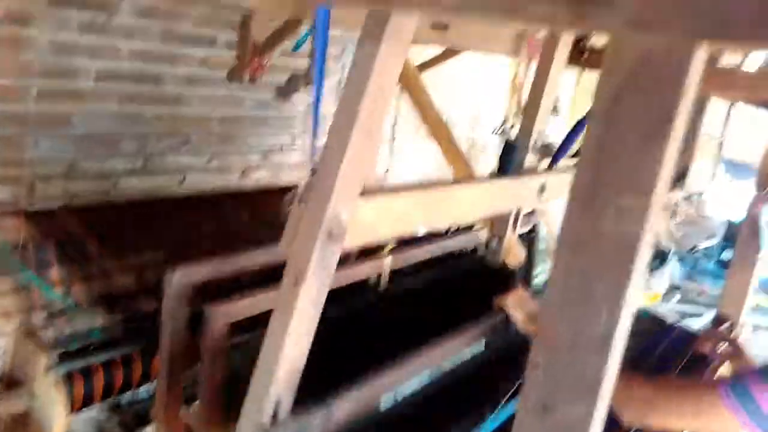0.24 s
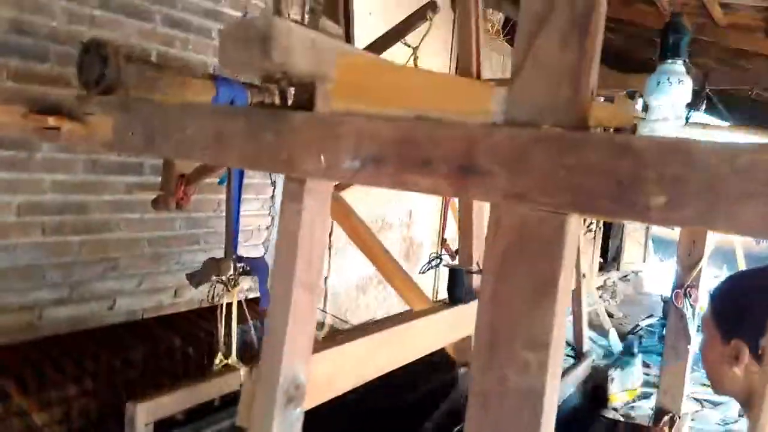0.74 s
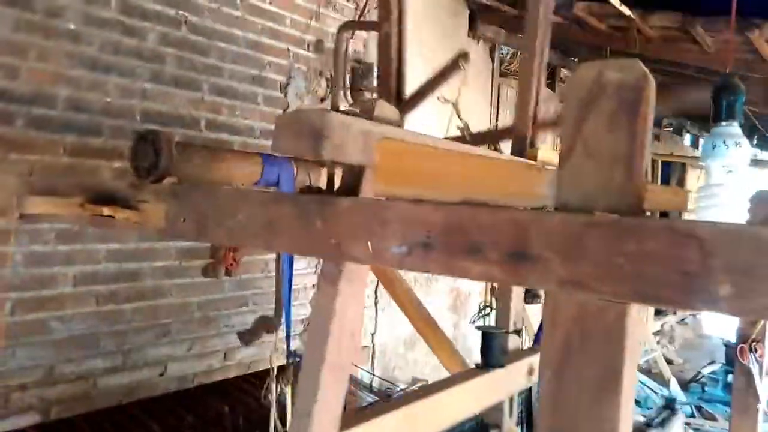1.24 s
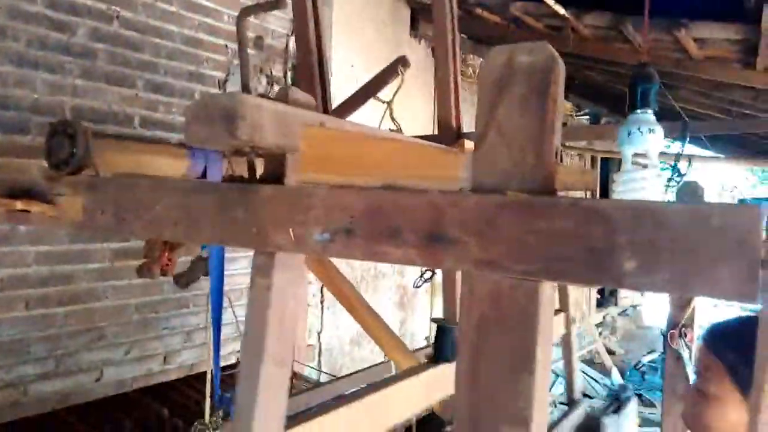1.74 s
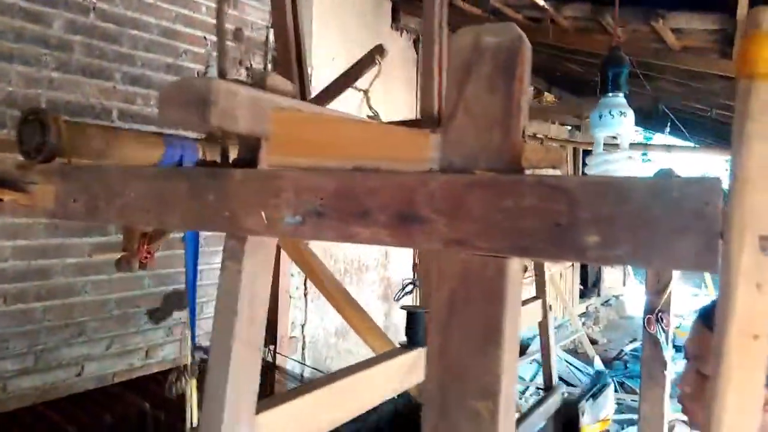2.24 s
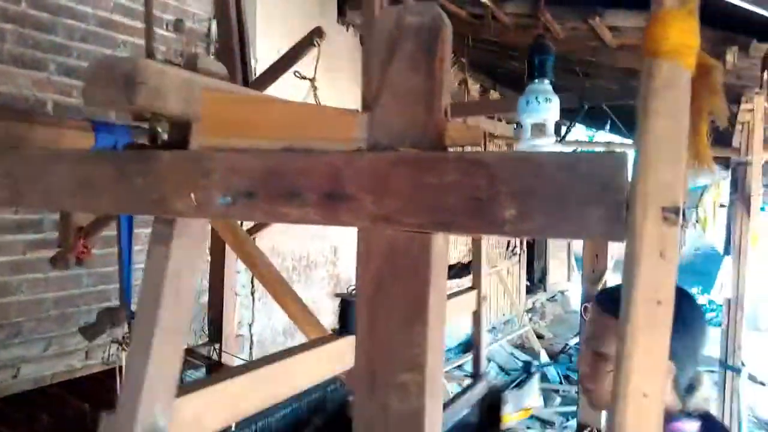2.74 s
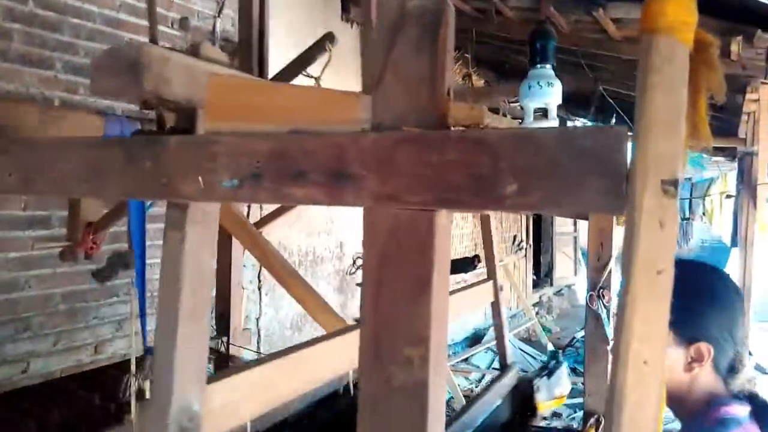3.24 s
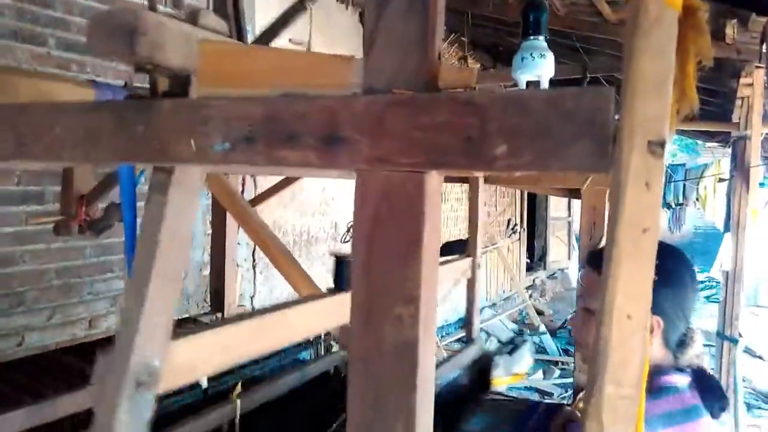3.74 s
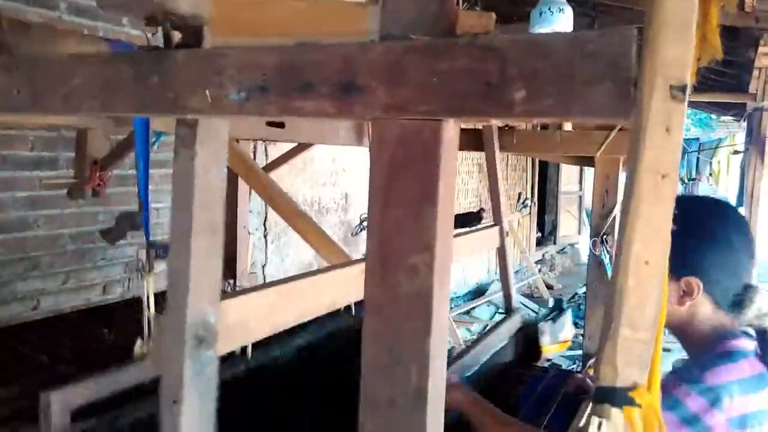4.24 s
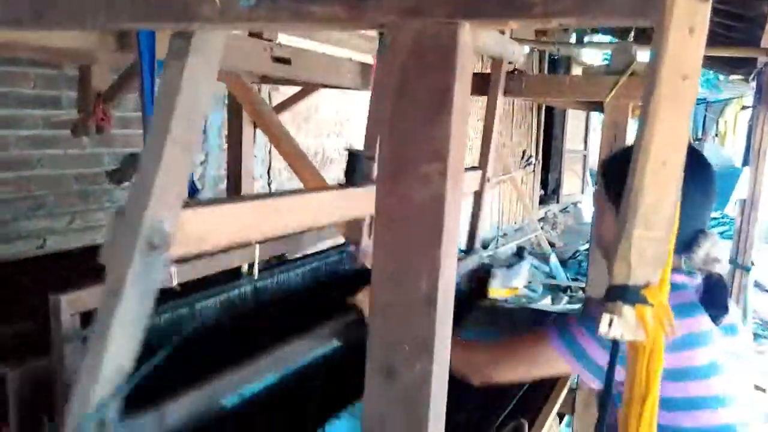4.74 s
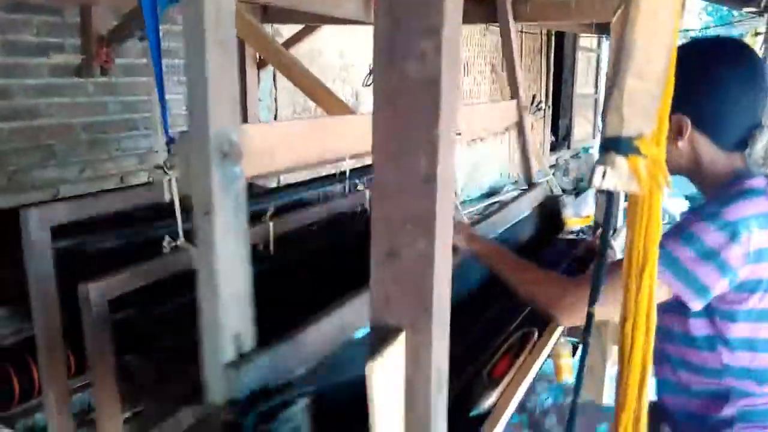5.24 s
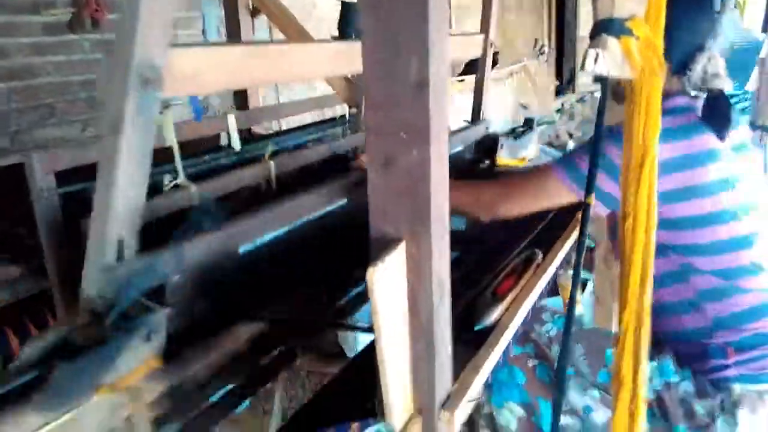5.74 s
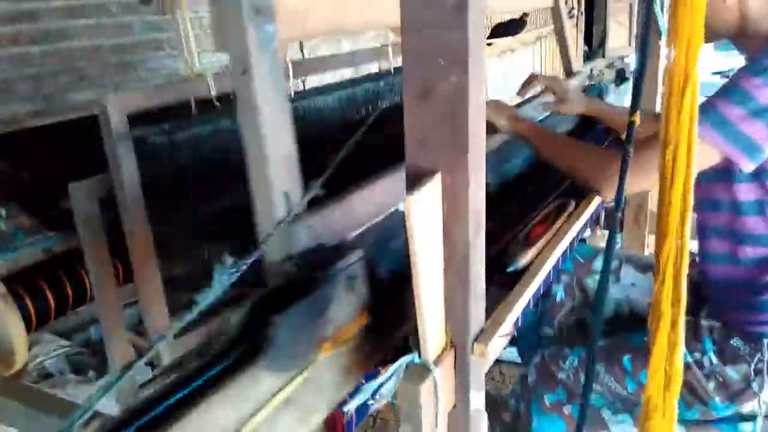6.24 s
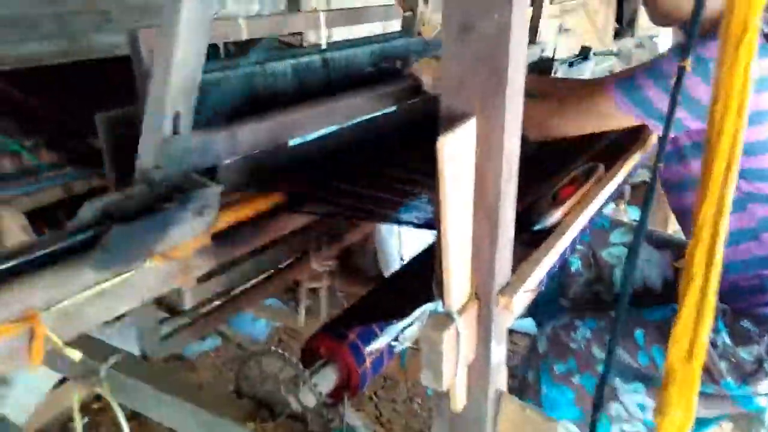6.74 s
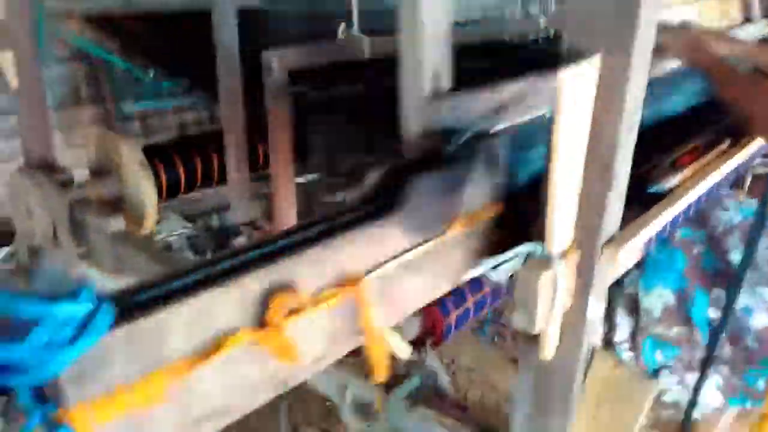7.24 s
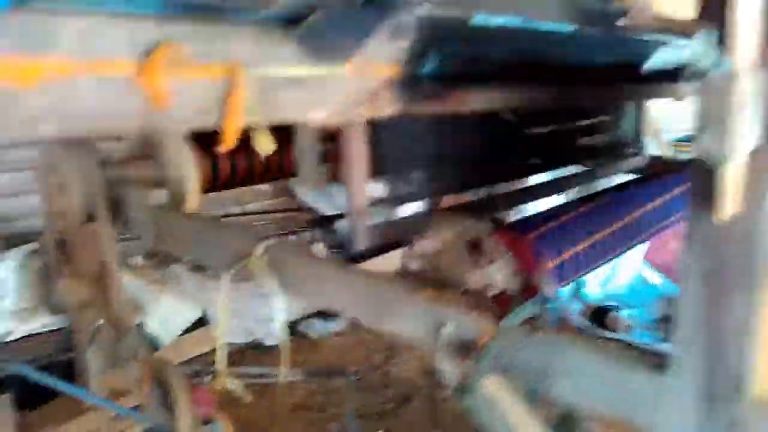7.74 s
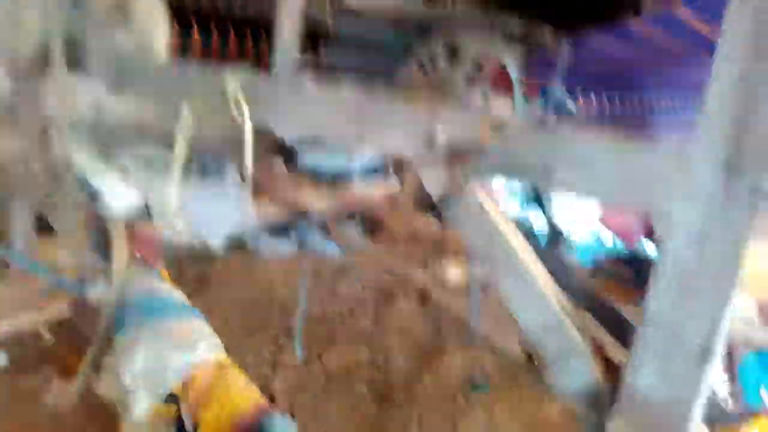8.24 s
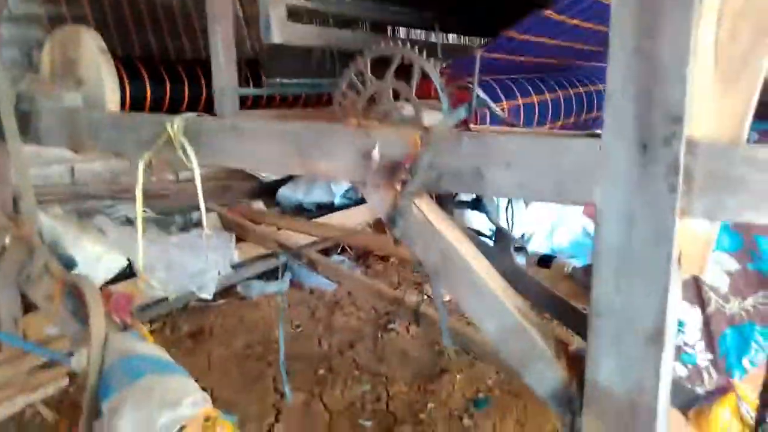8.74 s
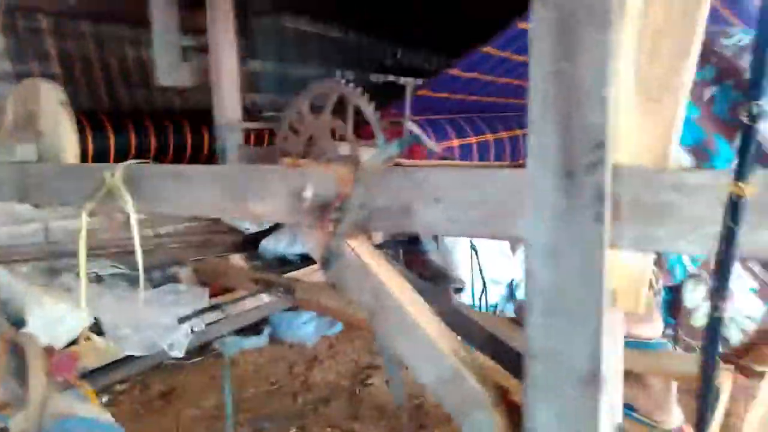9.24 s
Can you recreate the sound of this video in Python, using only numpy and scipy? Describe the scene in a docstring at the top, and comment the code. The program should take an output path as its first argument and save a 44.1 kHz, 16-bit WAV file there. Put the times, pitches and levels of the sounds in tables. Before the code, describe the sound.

Sharp wooden clacks repeat in a quick, even pattern as a handloom weaves close to the microphone. Each cycle brings a light clatter of treadles, the slap that throws the shuttle, then a cluster of knocks as it lands and the beater strikes. Threads rustle softly and thin wires tick between the blows, with only faint, still workshop air behind.

```python
"""A brick-walled workshop: a wooden fly-shuttle handloom, heard close, weaves about one pick a second.
Each stroke: treadle and heddle shafts clatter, a picker flings the shuttle, it lands in the opposite
box and rings its steel, then the beater swings home and the frame rattles. Between blows warp threads
rustle and wire heddles tick, over still air and a faint hum. Wood is decaying noise in clusters of
dense modes; steel and the sley (the beam carrying reed and boxes) ring as beating partials."""
import sys
import numpy as np
from scipy import signal
from scipy.fft import rfft, irfft
from scipy.io import wavfile

SR = 44100
rng = np.random.default_rng(int(sys.argv[2]) if len(sys.argv) > 2 else 0)


def to_wav(sig):
    """Store sig (one row per channel, or 1-D mono) as 16-bit WAV at the path in sys.argv[1].

    Samples outside -1..1 are clipped; the rate is SR.
    """
    pcm = np.clip(np.atleast_2d(sig), -1, 1) * 32767
    pcm = np.round(pcm).astype(np.int16)
    wavfile.write(sys.argv[1], SR, pcm.T)  # frames by channels


N = 418068
TIME_S = np.arange(N) / SR
AGE_S = np.arange(int(.6 * SR)) / SR  # life of one blow

# picker blows, outward and return in turn: start_s, wood_db, treble_db
STROKES = [(0.167, -5.5, -7), (1.126, -2.5, -7.5), (2.094, -6.5, -10), (3.043, -2, -6.5), (4.01, -5.5, -8),
           (4.975, -1.5, -8), (5.94, -6.5, -9.5), (6.89, -1.5, -6.5), (7.863, -7, -10), (8.817, 0.5, -7)]
# spectrum of shuttle and beater impacts: freq_hz, gain_db
IMPACT_COLOUR = [(40, -36), (110, -15.5), (300, -13.5), (450, -12.5), (750, -5), (1250, -0.5), (1800, -0.5),
                 (2800, 0), (4200, -1.5), (6500, -5.5), (10500, 1), (12500, -7.5), (14200, -14)]
# sley modes: pitch_hz, level_db, base_t60_s
SLEY_MODES = [(783, -9.5, .14), (983, -5.5, 0.16), (1280, -19, 0.13), (1375, -0.5, 0.083),
              (1389, -6.5, 0.27), (1406, -5, 0.12), (1740, -20, 0.056), (2333, -4, 0.19), (3100, -12, 0.13)]


def amp(db):
    return 10 ** (np.asarray(db) / 20)


def fade(t60_s):
    """Exponential decay over one blow."""
    return np.exp(-np.log(1000) * AGE_S / t60_s)


def add(track, start_s, sound):
    """Mix in a stereo sound."""
    i = min(max(int(start_s * SR), 0), N)
    track[:, i:i + sound.shape[1]] += sound[:, :N - i]


def colour(x, points):
    """Minimum-phase filter through points: freq_hz, gain_db."""
    size = 2048
    hz, db = np.transpose(points)
    bins_hz = np.maximum(np.arange(size // 2 + 1) * SR / size, 1)
    gain = amp(np.interp(np.log(bins_hz), np.log(hz), db))
    cepstrum = irfft(np.log(gain))
    cepstrum[1:size // 2] *= 2
    cepstrum[size // 2 + 1:] = 0
    impulse = irfft(np.exp(rfft(cepstrum)))
    return signal.fftconvolve(x, impulse[None], axes=1)[:, :N]


def flutter(count, rate_hz, depth_db):
    """Random gain, rms 1."""
    steps = np.arange(count) * rate_hz / SR
    levels = np.clip(rng.standard_normal(count), -2, 2)
    gain = amp(depth_db * np.interp(steps, np.arange(count), levels))
    return gain / np.sqrt(np.mean(gain ** 2))


def wood_modes(ripple_db=4.3, spacing_hz=75):
    """Dense modes in strong and weak clusters: three stereo noise bands, rms 1."""
    hz = np.arange(len(AGE_S) // 2 + 1) * SR / len(AGE_S)
    cluster_index = np.log1p(hz / 3500) * 3500 / spacing_hz
    strengths = np.clip(rng.standard_normal(200), -2, 2)
    clusters = amp(ripple_db * np.interp(cluster_index, np.arange(200), strengths))
    noise = irfft(rfft(rng.standard_normal((2, len(AGE_S)))) * clusters, len(AGE_S))
    bands_hz = [(400, 6500), (6500, 14500), (35, 400)]  # wood, treble, thump
    filters = [signal.butter(3, band, "band", fs=SR, output="sos") for band in bands_hz]
    bands = np.array([signal.sosfilt(sos, noise) for sos in filters])
    return bands / bands.std(axis=(1, 2), keepdims=True)


def blows(rows, spectrum, wood_db, wood_t60_s, treble_db, treble_t60_s, thump_db, thump_t60_s,
          crack_db, crack_t60_s, room_db, room_t60_s, chatter_db=0):
    """Struck wood: crack, modes, joint chatter, room tail. Rows: start_s, wood_db, treble_db, rise_s."""
    out = np.zeros((2, N))
    crack = amp(crack_db) * fade(crack_t60_s)
    room = amp(room_db) * fade(room_t60_s)
    decays = [np.sqrt(fade(t60_s) ** 2 + crack ** 2 + room ** 2) for t60_s in (wood_t60_s, treble_t60_s)]
    decays.append(fade(thump_t60_s))
    for start_s, wood, treble, rise_s in rows:
        gains = amp([wood + wood_db, treble + treble_db, wood + thump_db])
        attack = 1 - np.exp(-(AGE_S / rise_s) ** 2)
        chatter = flutter(len(AGE_S), rate_hz=359, depth_db=chatter_db)
        bands = wood_modes()  # each blow lands on a new spot and wakes other modes
        body = sum(gain * decay * band for gain, decay, band in zip(gains, decays, bands))
        add(out, start_s, attack * chatter * body)
    return colour(out, spectrum)


def ring(rows, modes, ring_db, t60_scale, split_hz, partials=5):
    """Ringing modes, each a cluster of close partials that beat. Rows: start_s, level_db."""
    out = np.zeros((2, N))
    age_s = AGE_S[:len(AGE_S) // 2]
    hop = 64
    attack = np.minimum(age_s / 0.00087, 1)
    hz, mode_db, base_t60_s = np.transpose(modes)[:, :, None]
    decaying = np.exp((2j * np.pi * hz - np.log(1000) / (base_t60_s * t60_scale)) * age_s)
    for start_s, level_db, *_ in rows:
        detune_hz = split_hz * rng.uniform(-1.02, 1, (partials, 1, len(modes), 1))
        phase_turns = detune_hz * age_s[::hop] + rng.random((partials, 2, len(modes), 1))
        beating = np.exp(2j * np.pi * phase_turns).sum(axis=0) / np.sqrt(partials)
        beating = np.repeat(beating, hop, axis=2)[:, :, :len(age_s)]
        tones = amp(level_db + mode_db + ring_db) * decaying
        add(out, start_s, (beating * tones).imag.sum(axis=1) * attack)
    return out


def workshop(air_db=-55, hum_hz=163, hum_gain_db=-1):
    """Still air; a faint hum swells and fades."""
    # air spectrum: freq_hz, gain_db
    air_colour = [(30, -8), (120, -6), (300, -3), (900, 0), (1550, -2), (1720, 4), (1950, -3), (6000, -8),
                  (10300, -2), (14000, -17)]
    # hum envelope: time_s, level_db
    hum_curve = [(0, -81), (5.2, -81), (5.799, -67), (6.4, -60), (6.8, -58), (7.2, -70), (8.6, -74),
                 (9.099, -76), (9.48, -58)]
    air = colour(rng.standard_normal((2, N)), air_colour)
    hum_db = np.interp(TIME_S, *np.transpose(hum_curve)) + hum_gain_db
    hum = amp(hum_db) * np.sin(2 * np.pi * hum_hz * TIME_S)
    return air * amp(air_db) / air.std() + hum


def threads(gain_db=-2):
    """Warp threads catch and slip on the reed, four swells a stroke."""
    # shed opens, shuttle flies, beater in, beater back: peak_after_picker_s, rise_s, fall_s, level_db
    rubs = [(-.025, 0.082, 0.073, -31), (.1, 0.037, 0.15, -34), (.365, 0.06, 0.048, -24),
            (0.558, 0.049, 0.048, -30)]
    # rustle spectrum: freq_hz, gain_db
    rustle_colour = [(40, -12), (200, -8.5), (450, -0.5), (950, 6), (1550, 5.5), (1730, 9.5), (1950, 2.5),
                     (3000, 3.5), (5000, 1), (7500, -4), (10300, 5), (12500, 0), (14200, -4)]
    offset_s = np.arange(-SR // 2, SR) / SR
    swells = np.zeros(len(offset_s))
    for peak_s, rise_s, fall_s, level_db in rubs:
        width_s = np.where(offset_s < peak_s, rise_s, fall_s)
        swells += amp(level_db) * np.exp(-((offset_s - peak_s) / width_s) ** 2)
    rubbing = sum(np.interp(TIME_S - start_s, offset_s, swells, left=0, right=0)
                  for start_s, *_ in STROKES)
    tugs = flutter(N, rate_hz=45, depth_db=3.5)
    catches = flutter(N, rate_hz=900, depth_db=4) * tugs
    return colour(rng.standard_normal((2, N)) * catches * rubbing * amp(gain_db), rustle_colour)


def shafts(tread_rise_s=0.0042, scatter_s=.0008, scatter_db=1):
    """Treadles lift and drop the heddle shafts: light, hollow clacks, never quite alike."""
    # clack as the treadle goes down: start_s, wood_db, treble_db
    treads = [(0.065, -16.5, -24), (1.032, -14, -18), (1.996, -14.5, -20), (2.946, -16.5, -21.5),
              (3.909, -15, -23), (4.883, -19.5, -34), (5.839, -17.5, -26), (6.794, -11, -15.5),
              (7.764, -15.5, -20), (8.724, -15.5, -18)]
    # clacks of each outward stroke: after_picker_s, wood_db, treble_db, rise_s
    outward = [(-.155, -28.5, -32.5, 0.0053), (-.064, -17, -26, 0.0013), (.165, -19.5, -29, 0.01),
               (.504, -20, -21.5, 0.017), (.655, -32.5, -34, 0.0087), (.679, -37, -41.5, 0.0058),
               (.768, -34, -44, 0.0032)]
    # clacks of each return stroke: after_picker_s, wood_db, treble_db, rise_s
    back = [(-.075, -15.5, -36, 0.0017), (-.045, -17.5, -25, 0.0025), (-.021, -21.5, -74, 0.0035),
            (0.173, -17, -25.5, 0.012), (.505, -27, -29, .009), (.556, -27, -31, .006),
            (.652, -29.5, -31, 0.014), (.766, -35, -37, 0.014)]
    # clack spectrum: freq_hz, gain_db
    clack_colour = [(40, -12), (110, -6), (300, -13.5), (500, -10), (750, -6), (1000, 1), (1400, -1.5),
                    (2000, -1), (3200, -2.5), (6500, -6), (10800, -3), (12500, -10), (14200, -13)]
    rows = [(*tread, tread_rise_s) for tread in treads]
    for k, (start_s, *_) in enumerate(STROKES):
        for after_s, wood_db, treble_db, rise_s in back if k % 2 else outward:
            late_s, harder_db = rng.standard_normal(2) * (scatter_s, scatter_db)
            rows.append((start_s + after_s + late_s, wood_db + harder_db, treble_db + harder_db, rise_s))
    clacks = blows(rows, clack_colour, wood_db=-2.5, wood_t60_s=0.19, treble_db=3.5, treble_t60_s=0.24,
                   thump_db=-32, thump_t60_s=0.12, crack_db=11, crack_t60_s=0.016,
                   room_db=-21, room_t60_s=0.53)
    return clacks + ring(rows, SLEY_MODES, ring_db=-18, t60_scale=2, split_hz=30)


def picker(rise_s=0.0017, rebound_s=0.016, rebound_db=-8, rebound_rise_s=0.0018):
    """The picker slaps the shuttle; on outward strokes it rebounds on its cord and the first box rings."""
    # slap spectrum: freq_hz, gain_db
    slap_colour = [(40, 2), (110, 2), (250, -4.5), (450, -12.5), (750, -2), (1300, 3), (1800, 2), (2800, 4),
                   (5000, 0.5), (7000, 1), (11000, 2), (12500, -4.5), (14200, -8)]
    outward = STROKES[::2]
    rows = [(*stroke, rise_s) for stroke in STROKES]
    rows += [(start_s + rebound_s, wood_db + rebound_db, treble_db + rebound_db, rebound_rise_s)
             for start_s, wood_db, treble_db in outward]
    slap = blows(rows, slap_colour, wood_db=-3, wood_t60_s=0.19, treble_db=4, treble_t60_s=0.15,
                 thump_db=-23.5, thump_t60_s=0.067, crack_db=4, crack_t60_s=0.028,
                 room_db=-15, room_t60_s=0.48, chatter_db=2.5)
    return slap + first_box(outward, ring_db=-7)


def first_box(rows, ring_db):
    """The first box's steel rings briefly, in wide clusters."""
    # box modes: pitch_hz, level_db, base_t60_s
    modes = [(1290, -5, .08), (8110, -7, .12), (9668, -5, .1), (10443, -11, .12), (11355, -2, .1),
             (12243, -9, .12), (13210, -8, .11), (14147, -11, .11)]
    return ring(rows, modes, ring_db, t60_scale=1.25, split_hz=55)


def shuttle():
    """The shuttle skids into a box and, once seated, rings its steel; at the first box also the sley."""
    # landings, second and first box in turn: start_s, wood_db, treble_db, seat_s, steel_db
    arrivals = [(0.405, -3.5, -19, 0.0038, -23.5), (1.364, -6, -18, 0.0086, -20),
                (2.339, -6, -15, 0.0025, -22.5), (3.289, -2, -14.5, .021, -17),
                (4.244, -5.5, -12, 0.0034, -22.5), (5.233, -8.5, -16.5, 0.0062, -13.5),
                (6.184, -5.5, -12, 0.0023, -36), (7.126, -4, -18, 0.018, -8.5),
                (8.108, -6, -17.5, 0.0026, -27), (9.058, -5.5, -20, 0.0097, -76)]
    rows = [row[:4] for row in arrivals]
    slam = blows(rows, IMPACT_COLOUR, wood_db=2, wood_t60_s=0.049, treble_db=6, treble_t60_s=0.47,
                 thump_db=-23, thump_t60_s=0.075, crack_db=8, crack_t60_s=0.034,
                 room_db=-3, room_t60_s=0.34, chatter_db=2)
    wood = [(start_s + seat_s, wood_db) for start_s, wood_db, _, seat_s, _ in arrivals]
    steel = [(start_s + seat_s, steel_db) for start_s, _, _, seat_s, steel_db in arrivals]
    hollow = sley_middle(wood[1::2], ring_db=-10.5, t60_scale=0.79, split_hz=31)
    return slam + hollow + second_box(steel[::2], ring_db=11) + first_box(steel[1::2], ring_db=5)


def second_box(rows, ring_db):
    """The second box's steel rings longer and purer."""
    # box modes: pitch_hz, level_db, base_t60_s
    modes = [(960, -2, .12), (7287, -4, .25), (8850, -5, .25), (9832, -4, .13), (10551, -8, .15),
             (11550, -1, .17), (12354, -10, .15), (13386, -6, .2)]
    return ring(rows, modes, ring_db, t60_scale=1.4, split_hz=28)


def frame(gain_db=8, rise_s=0.0047, pitch_scatter=0.055):
    """Hard blows shake the frame's heavy posts."""
    # thuds: start_s, level_db
    thuds = [(0.448, -36), (1.125, -38), (3.044, -33.5), (4.975, -44), (6.183, -34.5), (6.889, -27.5),
             (8.108, -42), (8.817, -33)]
    # low frame modes: pitch_hz, level_db, t60_s
    modes = [(73.6, 1.5, 0.046), (108.6, 6, 0.05), (149, -19, 0.047)]
    out = np.zeros((2, N))
    attack = np.minimum(AGE_S / rise_s, 1)
    for start_s, level_db in thuds:
        for pitch_hz, mode_db, t60_s in modes:
            detuned_hz = pitch_hz * (1 + pitch_scatter * rng.standard_normal())
            wave = np.sin(2 * np.pi * (detuned_hz * AGE_S + rng.random((2, 1))))
            add(out, start_s, amp(level_db + mode_db + gain_db) * wave * fade(t60_s) * attack)
    return out


def beater(out_rise_s=0.0032, back_rise_s=0.0028, rebound_rise_s=0.0034, rattle_treble_db=-9.5,
           settle_s=.089, settle_gain_db=-8.5, settle_rise_s=0.0048):
    """The beater drives the weft home and rebounds; the loose frame settles with a duller knock."""
    # blows on the cloth: start_s, wood_db, treble_db, rebound_after_s, rebound_db
    beats = [(0.456, 1.5, -3.5, 0.039, -5.5), (1.421, -2, -4.5, 0.069, -9.5), (2.386, -1.5, -10, 0.043, -4),
             (3.345, -0.5, -6, 0.076, -13), (4.289, -1.5, -7, 0.055, -2), (5.272, -4, -8.5, 0.046, -6),
             (6.23, 0.5, -8, 0.061, -7), (7.193, -5, -6.5, .087, -11.5), (8.149, 0, -3.5, 0.057, -6),
             (9.118, -3.5, -6.5, 0.076, -17)]
    rows = []
    for k, (start_s, wood_db, treble_db, after_s, rebound_db) in enumerate(beats):
        settle_db = wood_db + settle_gain_db
        rows += [(start_s, wood_db, treble_db, back_rise_s if k % 2 else out_rise_s),
                 (start_s + after_s, rebound_db, rebound_db + rattle_treble_db, rebound_rise_s),
                 (start_s + settle_s, settle_db, settle_db + rattle_treble_db, settle_rise_s)]
    strike = blows(rows, IMPACT_COLOUR, wood_db=-2.5, wood_t60_s=0.19, treble_db=2, treble_t60_s=0.14,
                   thump_db=-32, thump_t60_s=.08, crack_db=-1, crack_t60_s=0.017,
                   room_db=-27.5, room_t60_s=0.95)
    return strike + ring(rows, SLEY_MODES, ring_db=-23.5, t60_scale=1.93, split_hz=25)


def heddles(room_db=-11.5):
    """Thin wires snap past each other: bright tick, faint ring, a little room."""
    # wire snaps: start_s, level_db
    ticks = [(0.677, -41), (1.176, -15), (1.691, -22), (2.182, -19.5), (2.63, -29), (3.164, -18.5),
             (3.595, -27), (3.689, -31), (3.852, -29), (4.927, -19), (5.107, -22), (5.526, -35),
             (6.032, -18.5), (6.446, -20), (7.414, -30), (8.381, -28), (8.68, -23.5), (8.872, -12.5),
             (9.328, -26)]
    # tick spectrum: freq_hz, gain_db
    tick_colour = [(500, -10), (3000, -5.5), (7000, 4), (10000, 8), (11500, 3.5), (13000, 12), (14200, -15)]
    # wire modes: pitch_hz, level_db, base_t60_s
    modes = [(8200, 1, .14), (9300, 11.5, 0.17), (12000, 11, 0.12)]
    out = np.zeros((2, N))
    decay = fade(t60_s=0.014) + amp(room_db) * fade(t60_s=0.21)
    for start_s, level_db in ticks:
        add(out, start_s, amp(level_db) * rng.standard_normal((2, len(AGE_S))) * decay)
    return colour(out, tick_colour) + ring(ticks, modes, ring_db=-22.5, t60_scale=1.1, split_hz=68)


def picker_stop(rise_s=0.0021):
    """On outward strokes a picker drops back against its stop: one dry, dull knock."""
    # knocks: start_s, level_db
    knocks = [(0.725, -12.5), (2.649, -22.5), (4.566, -13), (6.491, -13.5), (8.422, -17)]
    # knock spectrum: freq_hz, gain_db
    knock_colour = [(40, -16), (300, -2), (500, -8.5), (1000, 11), (1500, 4.5), (2500, 3.5), (4000, -3.5),
                    (6500, -5), (10800, -6), (14200, -12)]
    rows = [(start_s, level_db, level_db, rise_s) for start_s, level_db in knocks]
    drop = blows(rows, knock_colour, wood_db=-4.5, wood_t60_s=0.13, treble_db=-7, treble_t60_s=0.14,
                 thump_db=-46, thump_t60_s=0.23, crack_db=-6, crack_t60_s=0.0094,
                 room_db=-33, room_t60_s=0.61, chatter_db=2.5)
    return drop + sley_middle(rows, ring_db=-9.5, t60_scale=0.78, split_hz=18)


def sley_middle(rows, ring_db, t60_scale, split_hz):
    """Blows near the boxes wake the sley's hollow middle modes."""
    modes = [mode for mode in SLEY_MODES if 900 < mode[0] < 1600]
    return ring(rows, modes, ring_db, t60_scale, split_hz)


def shed_creaks():
    """Faint pitched creaks as the shed changes."""
    # creaks: start_s, level_db
    creaks = [(0.94, -35), (2.75, -36), (2.895, -41), (3.70, -35), (7.65, -41)]
    # creak resonances: pitch_hz, level_db, base_t60_s
    modes = [(1730, 0.5, 0.13), (1830, -4, 0.2)]
    return ring(creaks, modes, ring_db=0.5, t60_scale=0.59, split_hz=43)


def stereo_image(x):
    """Close stereo pair: lows mostly in opposite phase, more treble on the left."""
    mid = colour(x[:1] + x[1:], [(60, -1.5), (300, -2), (700, -1.5), (1300, -.3), (3000, 0)]) / 2
    side = colour(x[:1] - x[1:], [(50, 4), (130, 6), (300, 8), (700, 5), (1300, .6), (3000, 0)]) / 2
    left = colour(mid + side, [(300, .8), (2500, -.2), (5500, 0), (8000, 2.7), (12000, 3)])
    right = colour(mid - side, [(300, -.8), (2500, .2), (5500, 0), (8000, -3.1), (12000, -3.7)])
    return np.vstack([left, right])


def scene():
    """The working loom in the still workshop."""
    loom = (shed_creaks() + picker() + shuttle() + beater()
            + shafts() + picker_stop() + heddles() + threads())
    return stereo_image(loom) + frame() + workshop()


def record(dry, gain_db=2, cutoff_hz=14300):
    """Soft clipping on the loudest blows, then a steep low-pass."""
    clipped = np.tanh(amp(gain_db) * dry)
    return signal.sosfilt(signal.ellip(10, .2, 70, cutoff_hz, fs=SR, output="sos"), clipped)


dry = scene()
out = record(dry)
to_wav(out)
```